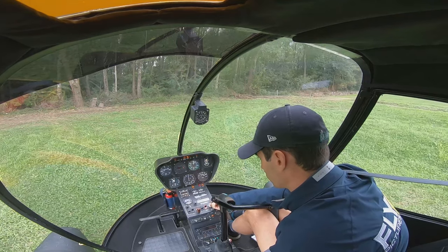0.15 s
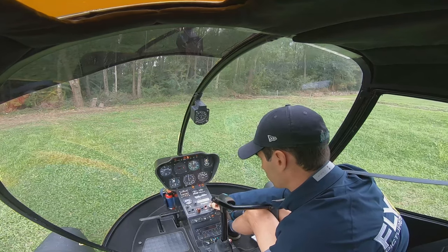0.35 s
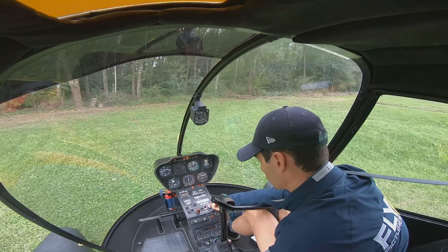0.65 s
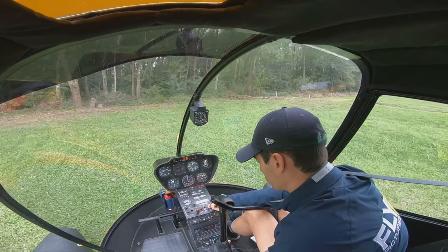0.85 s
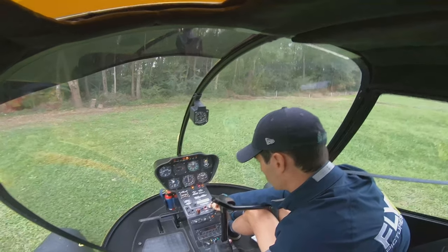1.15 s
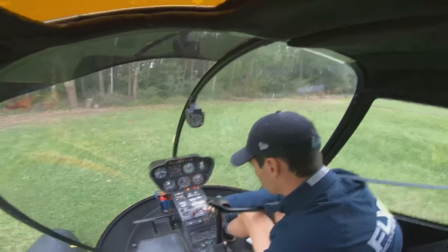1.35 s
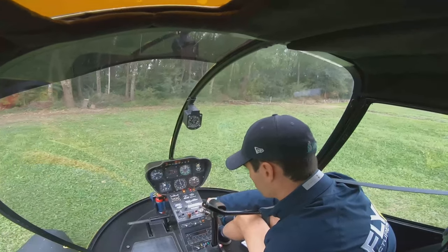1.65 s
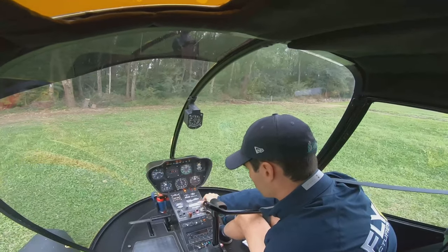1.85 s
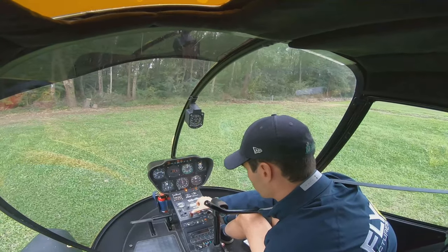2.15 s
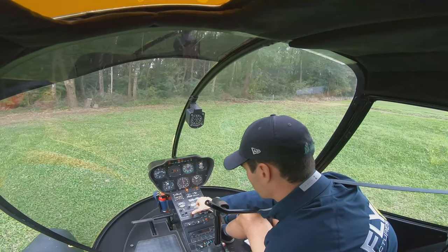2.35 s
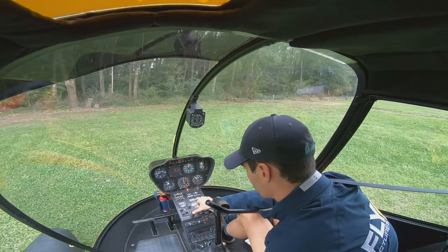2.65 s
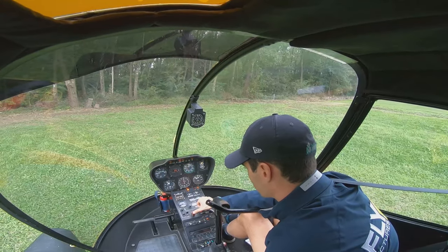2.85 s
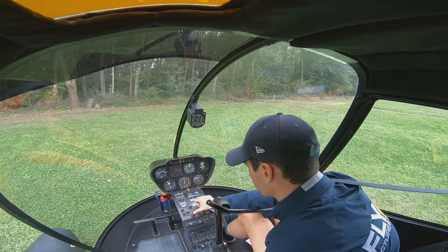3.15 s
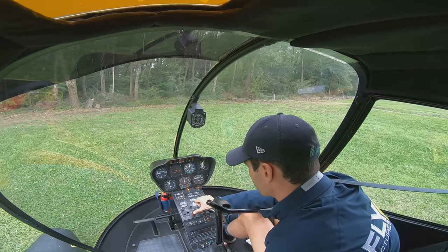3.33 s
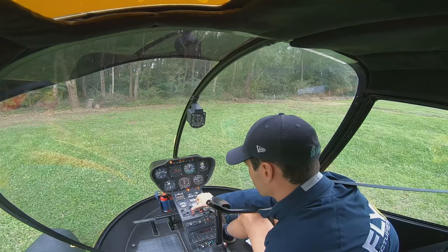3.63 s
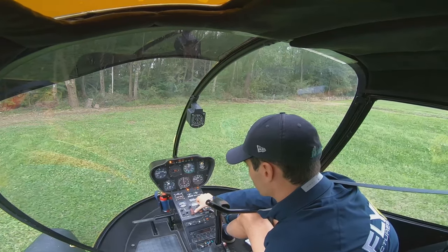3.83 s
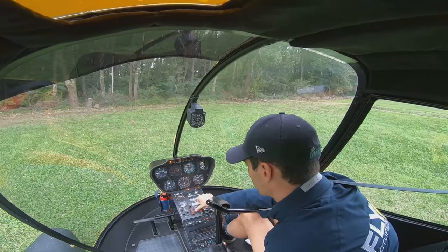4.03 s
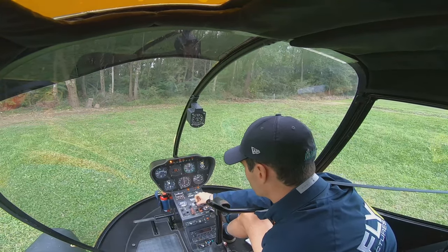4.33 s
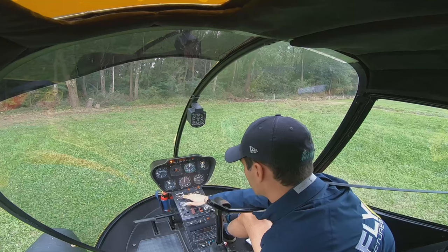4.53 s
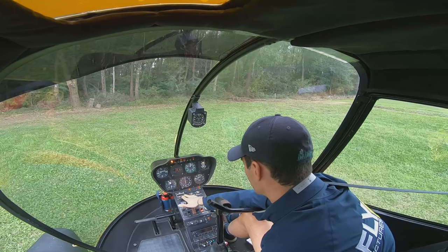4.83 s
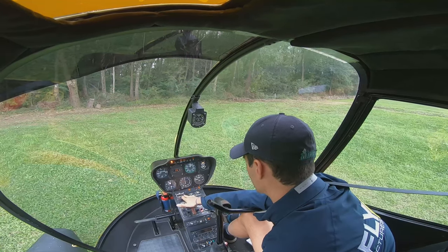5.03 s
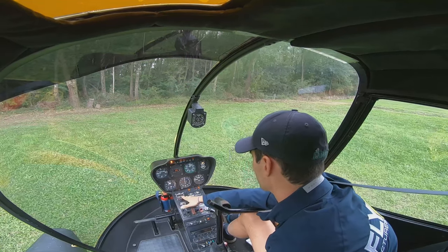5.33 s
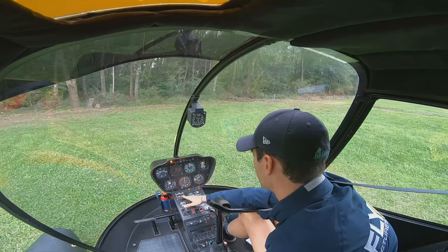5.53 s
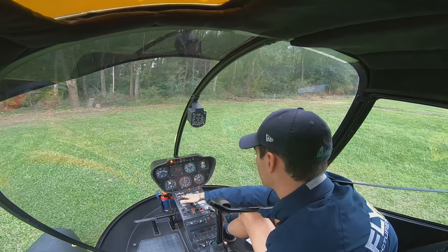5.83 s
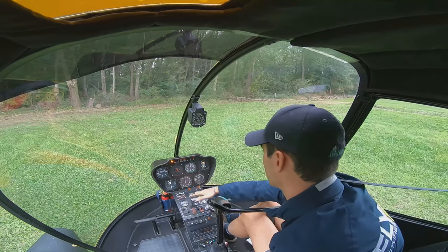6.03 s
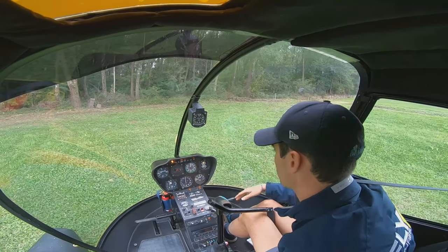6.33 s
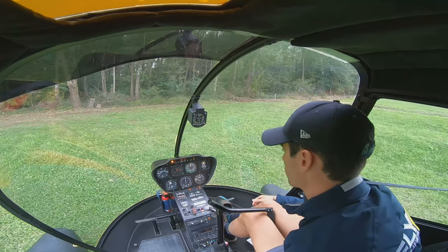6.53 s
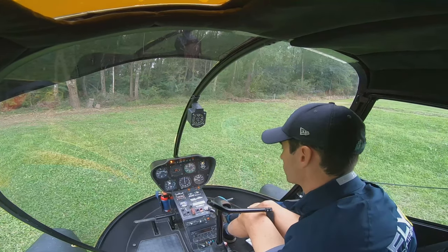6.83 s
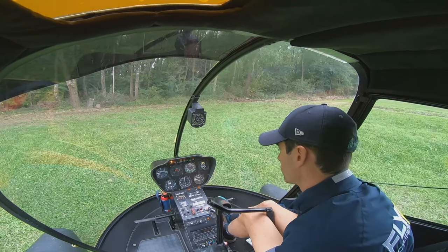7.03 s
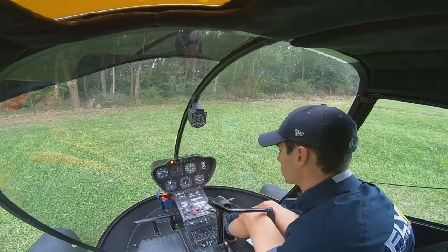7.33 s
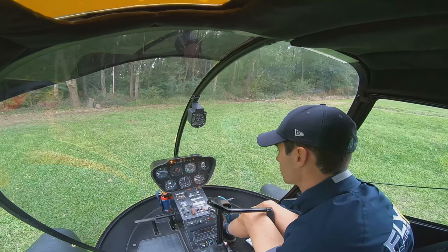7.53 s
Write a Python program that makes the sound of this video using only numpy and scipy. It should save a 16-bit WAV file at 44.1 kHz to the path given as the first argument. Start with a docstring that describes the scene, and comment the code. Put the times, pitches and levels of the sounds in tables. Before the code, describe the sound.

Close in-cabin microphone: metallic starter grinding and uneven, booming coughs crowd the first second and a half, shaking the panels. The four-cylinder engine takes hold behind the cabin, races slightly and settles into a bassy, lumpy drone. Knocking panels and soft fluttering air ride over it, sharp clicks appear near the middle, and low thumps mark misfires towards the end.

```python
"""A four-cylinder piston engine starts behind the cabin of a small helicopter, heard from inside.
The starter is shaped noise with ringing casing modes and squealing tones; air wheezes out as sliding noise.
Lone firings thump as decaying low tones, then the engine catches, overshoots and idles as a sum of firing orders.
Knocks and bangs ring the panels, stumbles swell as a low tone, the fan is fluttering hiss, and switches snap."""
import sys
import numpy as np
from scipy import signal
from scipy.fft import rfft, irfft
from scipy.io import wavfile
from scipy.ndimage import uniform_filter1d

SR = 44100
rng = np.random.default_rng(int(sys.argv[2]) if len(sys.argv) > 2 else 0)


def unload_wav(signal):
    """Save mono or channel-first audio to the path in sys.argv[1] as 16-bit WAV at rate SR, clipped to [-1, 1]."""
    wavfile.write(
        sys.argv[1],
        SR,
        np.round(np.clip(np.atleast_2d(signal).T, -1, 1) * 32767).astype(np.int16),
    )


N = 338688
T = np.arange(N) / SR  # time in seconds

# lone firings that thump the cabin:
# (start_s, level_db, pitch_hz, time_to_fall_60_db_s, panel_shake_db)
LONE_FIRINGS = [(0.009, -9, 70, 0.056, -34.5), (0.137, -24, 75, 0.68, -88), (0.269, -18, 73.5, 0.15, -48),
                (0.399, -6, 68.4, 0.069, -26), (0.438, -11.5, 57.3, 0.47, -26.5),
                (0.545, -24, 68, 0.22, -41), (0.668, -7, 75, 0.11, -28), (0.713, -15, 50.7, 0.34, -34),
                (0.867, -4, 69.2, 0.3, -23), (0.96, -20, 53.6, 0.39, -40), (1.013, -6, 59.7, 0.22, -27),
                (1.076, -10, 54.8, 0.63, -22.5), (1.149, -13, 57.2, 0.59, -24),
                (1.247, -11.5, 48.3, 0.65, -31.5), (1.31, -27, 50.4, 0.22, -41),
                (1.362, -5.5, 51.5, 0.17, -23)]
# idle stumbles, a missed firing: the steady firing tone dips and a low thump swells: (start_s, level_db)
MISSED_FIRINGS = [(3.382, -13), (3.831, -25), (4.289, -22), (4.89, -26), (5.82, -32), (6.078, -26),
                  (6.579, -13.5), (6.724, -8), (7.335, -9.5)]
CATCH_S, CATCH_RISE_S = 1.3, 0.17  # the engine catches, and takes this long to come up
STARTER_OFF_S = 1.54
IDLE_HZ = 44.8  # firing rate that counts as idle


def undb(db):
    """Turn decibels into a gain."""
    return 10 ** (np.asarray(db) / 20)


def unit(x):
    """Scale a signal to an rms level of 1."""
    return x / np.sqrt(np.mean(np.abs(x) ** 2))


def curves(table):
    """Join the points of each column by straight lines in time."""
    seconds, *columns = np.transpose(table)
    return [np.interp(T, seconds, column) for column in columns]


def shape(table, hz):
    """Read the gain at hz from a table of (pitch_hz, level_db)."""
    f, db = np.transpose(table)
    return undb(np.interp(np.log(hz + 1), np.log(f), db))


def ring(x, hz, width):
    """Ring one mode with a double pole; real and imaginary parts are a quarter cycle apart."""
    pole = np.exp((2j * hz - 1.14 * width) * np.pi / SR)
    once = signal.lfilter([1], [1, -pole], x)
    return signal.lfilter([1], [1, -pole], once)


def walk(rate):
    """Wander between random values, rate new ones a second, smoothed twice; spread a little under 1."""
    k = int(SR / rate)
    steps = np.repeat(rng.standard_normal(N // k + 1), k)
    return uniform_filter1d(uniform_filter1d(steps, k), k)[:N]


def gate(start, end, rise, fade):
    """Open in a straight line over rise seconds, hold, then die away exponentially."""
    return np.clip((T - start) / rise, 0, 1) * np.exp(-np.clip(T - end, 0, None) / fade)


def ticks(phase, size):
    """Place an impulse at each whole turn of the phase."""
    out = np.zeros(N)
    at = np.flatnonzero(np.diff(np.floor(phase)))
    out[at] = size[:len(at)]
    return out


def hiss(table):
    """Make two-channel noise of a given spectrum, with its own stereo width at each pitch."""
    # how wide the hiss is: (pitch_hz, side_minus_mid_db)
    hiss_width = [(700, -68), (2000, -5), (4000, -8), (6000, 0), (10000, 2.5)]
    f = np.fft.rfftfreq(N, 1 / SR)
    spectrum = rfft(rng.standard_normal((2, N))) * shape(table, f)
    mid, side = irfft(spectrum * [f ** 0, shape(hiss_width, f)], N)
    return unit(np.array([mid + side, mid - side]))


def starter():
    """Gear teeth grind on every compression and ring the casing, while some of them squeal."""
    # the starter labours over a compression: (start_s, end_s, grind_db, fade_s)
    strokes = [(0.288, 0.398, -41, 0.037), (0.556, 0.651, -41.5, 0.049), (0.761, 0.854, -43, 0.1),
               (0.867, 0.877, -22, 0.01), (0.933, 0.998, -41, .03), (0.977, 1.007, -31, 0.065),
               (1.03, 1.15, -38, 0.032), (1.124, 1.27, -41, 0.034), (1.343, 1.41, -36, 0.44)]
    # further gear squeals: (start_s, end_s, pitch_hz, level_db)
    gear_squeals = [(.352, .41, 8790, -51), (.27, .39, 3131, -59), (.39, .47, 3133, -48),
                    (.47, .62, 3129, -63), (.62, .74, 3129, -54), (.575, .635, 7850, -55),
                    (.25, .33, 1270, -46), (.8, .86, 7137, -52), (.79, .84, 3460, -52)]
    # thin whining tones, loudest at the start, each dying away at its own rate:
    # (pitch_hz, start_level_db, fade_s)
    whine_tones = [(3135, -52, 0.065), (1317, -41.5, 0.062), (340, -47, .3), (480, -42, 0.19),
                   (920, -44.5, 0.081)]
    # ringing modes of the starter casing: (pitch_hz, width_hz, level_db)
    casing_modes = [(2040, 73, -14), (2207, 46, -7), (2620, 66, -14), (3200, 43, -12.5), (3440, 73, -13),
                    (4120, 42, -12), (4280, 72, -15), (4710, 110, -15.5), (3700, 23, -29), (4020, 55, -25),
                    (5580, 57, -12), (5930, 31, -19), (6200, 70, -26), (6960, 100, -14), (7670, 36, -15)]
    # spectrum of the grind: (pitch_hz, level_db_per_hz), relative
    grind_spectrum = [(700, -12), (1500, -11), (2300, -2.5), (3200, -2.5), (4200, -8.5), (5500, -9.5),
                      (7800, -8), (9500, -16), (10400, -20), (13400, -20.5), (16000, -64)]
    squeal_hz, squeal_s, squeal_db = 7070, 0.057, -53  # pinion squeal ending the first compressions
    flicker_db, flicker_per_s = 2.5, 30  # each casing mode is caught now and then

    load = undb(-69.0) ** 2
    for a, b, db, fade in strokes:
        load = load + (undb(db) * gate(a, b, 0.041, fade)) ** 2
    load = np.sqrt(load)

    def tone(f):
        """A sine whose level and pitch both waver."""
        level = np.sqrt(2) * undb(2.8 * walk(91.4))
        turns = np.cumsum(f + 6.3 * walk(40.6)) / SR
        return level * np.sin(2 * np.pi * turns + rng.uniform(-.5, .5, (2, 1)))

    pinion = [(b - squeal_s, b + 0.0078, squeal_hz, squeal_db) for _, b, _, _ in strokes[:3]]
    squeal = sum(undb(db) * gate(a, b, 0.0065, 0.0051) * tone(f) for a, b, f, db in gear_squeals + pinion)
    whine = sum(undb(db) * np.exp(-T / fade) * np.sin(2 * np.pi * f * T) for f, db, fade in whine_tones)

    end = int(STARTER_OFF_S * SR)
    teeth = rng.standard_normal((2, end)) * undb(3.7 * walk(300)[:end])  # uneven teeth strike the casing
    casing = 0
    for f, width, db in casing_modes:
        flicker = flicker_db * walk(flicker_per_s)[:end]
        casing = casing + undb(db + flicker) * unit(ring(teeth, f, width).real)
    casing = np.pad(casing, ((0, 0), (0, N - end)))
    grind = undb(0.5) * hiss(grind_spectrum) + casing
    return load * undb(2.0 * walk(220)) * grind + squeal + whine


def cranking_shake():
    """Gains of panel shake and cabin rumble: the starter's load plus a burst after each lone firing."""
    engage_s, engage_rise_s = 0.12, 0.16  # the starter takes up its load
    rest_db, loaded_db, base_rumble_db = -49.5, -32.5, -31.5  # panels before and under load; cabin rumble
    lead_s = 0.0081  # the panels crack before the cabin swells
    rise_s, hold_s, shake_fade_s = 0.0074, 0.02, 0.032  # burst after each lone firing
    after_db, rumble_fade_s = -13, 0.093  # rumble burst, relative to the firing's level
    load = np.clip((T - engage_s) / engage_rise_s, 0, 1)
    # separate noises add as powers
    shake = undb(rest_db + (loaded_db - rest_db) * load) ** 2
    rumble = undb(base_rumble_db) ** 2
    for s, db, _, _, shake_db in LONE_FIRINGS:
        shake_burst = gate(s - lead_s, s + hold_s, rise_s, shake_fade_s)
        rumble_burst = gate(s, s + hold_s, rise_s, rumble_fade_s)
        shake = shake + (undb(shake_db) * shake_burst) ** 2
        rumble = rumble + (undb(db + after_db) * rumble_burst) ** 2
    return np.sqrt(shake), np.sqrt(rumble)


def panels(phase, knock_gain, shake_gain, bright_db, over_hz):
    """Knocks repeat every cycle, varying in level, and ring nearby panels over bangs and a steady shake."""
    # panels and frame: (pitch_hz, knock_width_hz, relative_level_db, side_share_db)
    panel_modes = [(205, 40, -4, -25), (258, 40, -1, -22), (316, 28, 1.2, -24), (348, 20, -3, -21),
                   (400, 50, -3, -18), (460, 40, -4, -16), (492, 30, -8, -14), (525, 35, 2, -14),
                   (562, 25, -3, -11), (622, 45, -3, -9), (720, 110, -5.5, -6), (850, 60, -10, -1),
                   (995, 70, -12, 0), (1080, 40, -13, -2), (1228, 34, -4.5, -6), (1280, 36, -3.5, -4),
                   (1360, 32, -5.5, -5), (1440, 50, -10.5, -4), (1522, 36, -7, -4), (1645, 40, -13, -4),
                   (1970, 200, -15, -5), (2500, 700, -17, -6), (3150, 500, -21, -6)]
    # valve-gear knocks in a cycle of four firings: (share_of_cycle, relative_level_db, panel_centre_hz)
    valve_knocks = [(0, 12, 320), (.05, 2, 850), (.12, 2, 850), (.15, 4, 520), (.21, 3, 850), (.25, 8, 310),
                    (.255, 13, 1250), (.27, 2, 560), (.34, 9, 1350), (.36, 3, 850), (.385, 8, 300),
                    (.41, 2, 540), (.46, 7, 1250), (.53, 7, 320), (.58, 6, 1300), (.64, 6, 1400),
                    (.68, 15, 530), (.75, 7, 310), (.755, 3, 900), (.76, 4, 1300), (.87, 7, 500),
                    (.95, 2, 1300), (.98, 4, 560)]
    # the engine bangs against its mounts while it coughs: (start_s, relative_level_db, panel_centre_hz)
    mount_bangs = [(0.389, -31, 300), (.438, -26, 500), (0.669, -28, 300), (0.714, -32, 603),
                   (0.861, -14, 313), (.874, -23, 1200), (.893, -19, 900), (.94, -28, 230),
                   (1.002, -14, 543), (1.069, -9.5, 340), (1.077, -20, 1300), (1.119, -12, 330),
                   (1.145, -28, 298), (1.171, -12, 400), (1.241, -18.5, 550), (1.304, -21, 495),
                   (1.346, -16.5, 370), (1.37, -12, 420), (1.385, -13, 750), (1.425, -9.5, 300),
                   (1.457, -18, 456)]
    # how cranking shakes the panels: (pitch_hz, level_db)
    crank_colour = [(200, 4.5), (320, -4), (550, -6.5), (900, 6), (1300, -8), (2000, -0.5), (3000, -2.5)]
    # faster knocking favours other panels: (pitch_hz, level_db_per_hz_above_idle)
    racing_tilt = [(200, 1.2), (320, -0.6), (480, 2), (530, 0.23), (575, 1), (700, 0.78)]
    bang_octaves, bang_spread_s = 0.85, .014  # reach across panels; each answers a little late
    low_db_per_s = 0.55  # the lowest panels gain after the catch, as the idle slows

    blows = []
    for share, db, _ in valve_knocks:
        sizes = undb(db + 1.6 * rng.standard_normal(100))
        blows.append(ticks(phase / 4 - share, sizes))
    at, bang_db, centre = np.transpose(mount_bangs)
    # how each bang happens to catch each panel
    grip = rng.uniform(-1.04, 1, (len(mount_bangs), len(panel_modes)))
    late = rng.random((len(mount_bangs), len(panel_modes))) ** 2
    out = 0
    for k, (hz, width, db, side_db) in enumerate(panel_modes):
        knock = sum(b * np.exp(-(np.log2(hz / c) / 0.45) ** 2) for b, (_, _, c) in zip(blows, valve_knocks))
        struck = knock_gain * unit(ring(knock, hz, width)) * (.9 if hz < 1800 else 0)

        jolts = np.zeros(N)
        when = ((at + bang_spread_s * late[:, k]) * SR).astype(int)
        reach = np.exp(-(np.log2(hz / centre) / bang_octaves) ** 2)
        jolts[when] = undb(bang_db + 3.5) * grip[:, k] * reach
        # a doubled mode swells to 1 / (e x damping) of the blow, so undo that
        banged = ring(jolts, hz, 2 * width) * np.e * 1.33 * width * np.pi / SR

        racing_db = np.interp(hz, *np.transpose(racing_tilt)) * over_hz
        slowing_db = low_db_per_s * (hz < 330) * np.clip(T - CATCH_S, 0, None)
        shift = undb(racing_db + slowing_db)
        struck = struck * shift + banged

        steady = .36 if hz < 700 else .8
        running = steady * shift * knock_gain * undb(1.5 * walk(8.2))
        cranking = shake_gain * shape(crank_colour, hz)
        # the twin panel across the cabin shakes on its own and widens the sound
        shake, twin = unit(ring(rng.standard_normal((2, N)), hz, 1.62 * width)) * (running + cranking)
        side = (-1) ** k * undb(side_db) * (struck.imag + .7 * shake.imag + .7 * twin.real)
        both = (struck + shake).real + side * np.array([[1], [-1]])
        out = out + undb(db + bright_db * (hz > 1100)) * both
    return out * undb(-6.0)


def boom(hz, phase, on, rumble):
    """Sum the firing orders as the cabin passes them, then add uneven firings and rumble in its modes."""
    # how the cabin answers a low tone: (pitch_hz, level_db)
    cabin_answer = [(24, -45), (36, -29), (43, -17.5), (48, -13.5), (55, -10.5), (66, -14), (86, -23),
                    (91, -27.5), (95, -34), (98, -46), (112, -55), (124, -31), (131, -25.5), (138, -27.5),
                    (141, -31), (144, -40), (147, -36), (166, -34), (176, -46), (187, -36), (195, -45),
                    (220, -50), (232, -46), (241, -35.5), (248, -46), (262, -44), (292, -46), (306, -46),
                    (318, -39), (390, -52), (437, -60), (486, -51), (535, -48)]
    # cabin modes rung by the unevenness of the firings: (pitch_hz, width_hz, relative_level_db)
    cabin_modes = [(36.4, 87, -10), (66.6, 31, 6), (88.3, 81, 1), (122.35, 2.4, -2.5), (136.8, 23.6, -1.5)]
    # strength of each cylinder in turn: (relative_level_db)
    cylinder_db = [-1.5, 2.0, -.7, -.1]
    # firing orders above the first: (time_s, extra_level_db)
    upper_orders = [(1.4, 1.8), (3.0, -1.8), (3.8, 0), (4.4, 0), (5.9, 1), (6.5, 0.6), (7.68, -1)]
    orders_db = -1
    # the slower it turns, the more unevenly it fires, up to a top level
    idle_uneven_db, uneven_db_per_hz, uneven_top_db = -28.5, -1.5, -27
    miss_db, miss_s = 3.5, 0.033  # dip of the orders at a stumble: depth above its level, 1/e half-width
    lead = .6  # radians, shared by all orders, which skews each pulse

    upper_db, = curves(upper_orders)
    orders = 0
    for k in range(1, 12):
        level = np.sqrt(2) * undb(upper_db * (k > 1)) * shape(cabin_answer, k * hz)
        orders = orders - level * np.cos(2 * np.pi * k * phase + lead)
    dip = 1
    for s, db in MISSED_FIRINGS:
        dip = dip - undb(db + miss_db) * np.exp(-((T - s - miss_s / 2) / miss_s) ** 2)
    dip = np.clip(dip, 0, 1)

    strength = undb(np.resize(cylinder_db, 400)) + .3 * rng.uniform(-1, 1, 400)
    push = ticks(phase, strength - strength.mean())  # each firing's excess or shortfall

    def in_cabin(x):
        """Ring every cabin mode with x."""
        return unit(sum(undb(db) * unit(ring(x, f, w).real) for f, w, db in cabin_modes))

    uneven = in_cabin(push)
    rough = in_cabin(rng.standard_normal(N))
    uneven_db = np.minimum(idle_uneven_db + uneven_db_per_hz * (hz - IDLE_HZ), uneven_top_db)
    return on * (undb(orders_db) * dip * orders + undb(uneven_db) * uneven) + rumble * rough


def thumps():
    """A soft push of gas swells quickly and the cabin rings on at two low pitches."""
    out = np.zeros(N)
    for s, db, f, t60, _ in LONE_FIRINGS:
        t = np.clip(T - s, 0, None)
        swell = (1 - np.exp(-t / 0.0033)) * undb(-60 * t / t60)
        overtone = 0.6 * np.sin(2 * np.pi * 1.575 * f * t) * np.exp(-t / 0.05)
        out -= undb(db) * swell * (np.sin(2 * np.pi * f * t) + overtone)
    return out


def wheezes():
    """A narrow band of air noise slides down in pitch as the pressure after a compression drains."""
    # air wheezing out: (start_s, level_db)
    air_puffs = [(.38, -30.5), (.655, -36.5)]
    start_hz, width_hz = 1530, 420
    hold_s, octaves_per_s, length_s = .025, -14, .075  # wait before sliding, slide, time before fading
    out = np.zeros(N)
    for s, db in air_puffs:
        hz = start_hz * 2 ** (octaves_per_s * np.clip(T - s - hold_s, 0, None))
        air = unit(ring(rng.standard_normal(N), 0, width_hz))
        moved = (air * np.exp(2j * np.pi * np.cumsum(hz) / SR)).real  # carry the noise up to hz
        out += undb(db) * gate(s, s + length_s, 0.012, 0.016) * moved
    return out


def clicks():
    """A broad noise snap has a rebound and a short tail, and rings a small housing."""
    # panel switches, the starter pinion and the crack of the hardest firings:
    # (start_s, level_db, left_minus_right_db, time_to_fall_60_db_s, snap_centre_hz,
    #  housing_ring_db, snap_db, rebound_after_s)
    snaps = [(0.8758, -13.5, -2, 0.15, 2280, -26, -17, 0.015),
             (1.0845, -15.5, 0, .06, 2600, -26, -14, 0.0087), (1.3443, -27.5, 1, 0.049, 4500, -7, -9, .012),
             (1.4125, -23, -10, 0.042, 7500, -20, -1.5, 0.014),
             (3.591, -18, .5, 0.046, 5350, -21, -20, .008),
             (3.6471, -11.5, 1, 0.082, 3900, -3, -3.5, 0.011),
             (4.1025, -20, 2, 0.038, 5900, -20, -17, 0.0057)]
    # modes of the small housing: (pitch_hz, level_db, time_to_fall_60_db_s)
    housing_modes = [(3490, 1.5, 0.012), (4700, -15, 0.014), (5900, -6.5, 0.0087)]
    out, t = np.zeros((2, N)), T[:4000]
    modes = sum(undb(db - 60 * t / t60) * np.sin(2 * np.pi * f * t) for f, db, t60 in housing_modes)
    modes = modes * (1 - np.exp(-t / 0.00027))  # soften the onset
    for s, db, pan_db, t60, hz, ring_db, snap_db, rebound_s in snaps:
        noise = rng.standard_normal((2, len(t))) + rng.standard_normal(len(t))  # partly shared by both sides
        snap = undb(snap_db) * 1.6 * t / .0006 * np.exp(-t / .0006)
        tail = .12 * undb(-60 * t / t60)
        rebound = 0.06 * np.exp(-((t - rebound_s) / (.6 * rebound_s)) ** 2)
        crack = unit(ring(noise, hz, 3600.).real) * (snap + tail + rebound)
        pan = np.array([[pan_db], [-pan_db]]) / 2
        i = int(s * SR)
        out[:, i:i + len(t)] += undb(db + pan) * (undb(ring_db) * modes + crack)
    return out


def fan(phase, fan_db):
    """Cooling air hisses and rings the cowling, flutters with the firings and pulses once a cycle."""
    # spectrum of the air hiss: (pitch_hz, level_db_per_hz), relative
    air_spectrum = [(600, -47), (1200, -24), (1800, -17), (2600, -21), (3300, -22.5), (3900, -28),
                    (5600, -30), (7900, -35.5), (9200, -39.5), (10400, -50.5), (11500, -39), (14500, -73),
                    (16000, -85.5)]
    # cowling modes ringing in the air stream: (pitch_hz, width_hz, level_db)
    cowling_modes = [(1960, 50, -13), (2570, 80, -13), (4620, 40, -22), (5850, 60, -26)]
    rings = 0
    for f, width, db in cowling_modes:
        tone = unit(ring(rng.standard_normal((2, N)), f, width).real)
        rings = rings + undb(db + 3.9 * walk(9)) * tone
    turn = (phase / 4 - .42) % 1  # place within a cycle of four firings
    flutter = 1 + 0.1 * np.cos(2 * np.pi * phase) + 0.41 * np.exp(-turn / 0.06)
    return undb(fan_db + 1.0 * walk(12)) * flutter * (hiss(air_spectrum) + rings)


def stumbles():
    """Each stumble swells into the main cabin mode and dies within a few cycles."""
    out = np.zeros(N)
    for s, db in MISSED_FIRINGS:
        t = np.clip(T - s, 0, None) / .015  # the swell peaks after 0.015 s
        out += undb(db) * t * np.exp(1 - t) * np.sin(2 * np.pi * 65.5 * (T - s))
    return out


def scene():
    """Crank the engine, let it catch and idle, and add up everything heard in the cabin."""
    # crankshaft speed: (time_s, firing_rate_hz)
    engine_speed = [(1.35, 24.3), (1.42, 26.8), (1.49, 32.7), (1.54, 36.9), (1.6, 41.2), (1.65, 43.9),
                    (1.72, 46.4), (1.97, 48.5), (2.42, 49.0), (2.86, 45.5), (3.08, 44.4), (3.96, 43.9),
                    (4.15, 44.4), (4.74, 43.6), (6.02, 43.7), (6.57, 43.2), (6.64, 42.6), (7.06, 42.7),
                    (7.34, 41.9), (7.68, 41.9)]
    # valve-gear knocking, easing as the engine warms or races
    knock_db, knock_db_per_s, knock_db_per_hz = -27.5, -0.3069, -0.79
    # the bright panels: sinking while cranking; once running, held and then sinking
    crank_bright_db, crank_bright_db_per_s = 4.5, -3
    bright_db, bright_hold_s, bright_db_per_s = -4, 3.1, -2
    fan_db, rush_db, rush_fade_s = -43.5, 3, 0.15  # air rushes as the engine catches

    hz, = curves(engine_speed)
    phase = np.cumsum(hz) / SR  # one turn per firing
    over_hz = np.clip(hz - IDLE_HZ, 0, None)
    since = np.clip(T - CATCH_S - CATCH_RISE_S, 0, None)  # seconds since the engine fully caught
    on = np.clip((T - CATCH_S) / CATCH_RISE_S, 0, 1)
    cranking = np.clip((STARTER_OFF_S - T) / 0.2, 0, 1)
    shake, rumble = cranking_shake()

    running_bright = bright_db + bright_db_per_s * np.clip(since - bright_hold_s, 0, None)
    cranking_bright = crank_bright_db + crank_bright_db_per_s * T
    panel_bright = on * running_bright + (1 - on) * cranking_bright
    knock_gain = on * undb(knock_db + knock_db_per_s * since + knock_db_per_hz * over_hz)

    low = boom(hz, phase, on, cranking * rumble) + thumps() + stumbles()
    low = low * undb([[-.2], [.2]])  # slightly stronger on the right
    rattle = panels(phase, knock_gain, cranking * shake, panel_bright, over_hz)
    air = on * fan(phase, fan_db + rush_db * np.exp(-since / rush_fade_s))
    return low + rattle + air + cranking * starter() + wheezes() + clicks()


def record(dry):
    """Round the peaks, cut off steeply at a ceiling, and step down by about 10 dB above a lower edge."""
    step_hz, ceiling_hz = 10454, 15100
    rounded = np.tanh(1.33 * dry) / 1.056
    ceiling = signal.ellip(8, .2, 70, ceiling_hz, fs=SR, output="sos")
    step = signal.ellip(7, .2, 10, step_hz, fs=SR, output="sos")
    return signal.sosfilt(step, signal.sosfilt(ceiling, rounded))


dry = scene()
out = record(dry)
unload_wav(out)
```